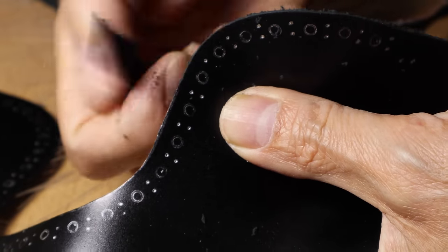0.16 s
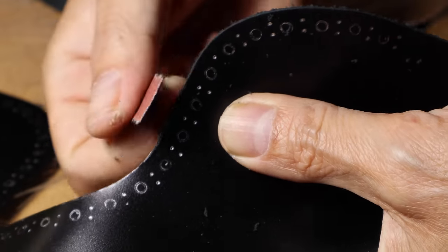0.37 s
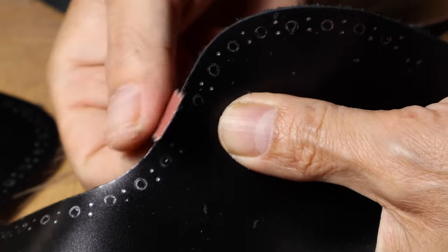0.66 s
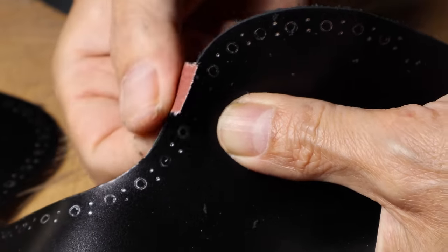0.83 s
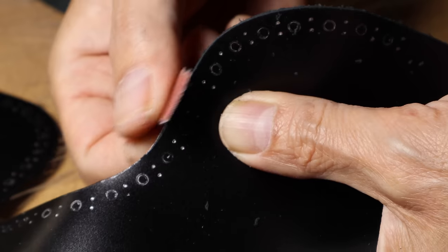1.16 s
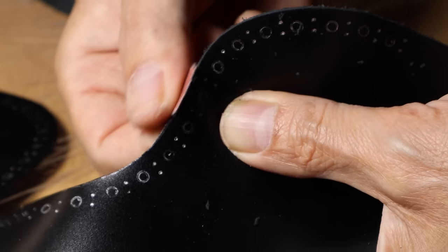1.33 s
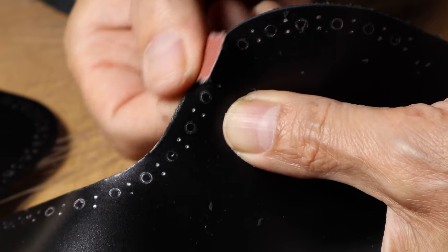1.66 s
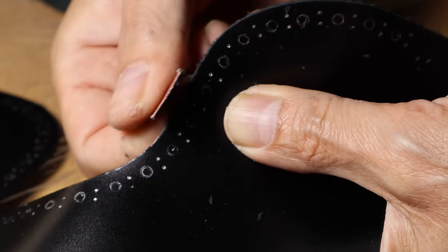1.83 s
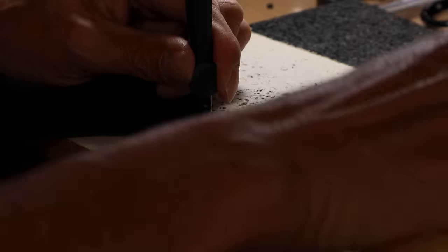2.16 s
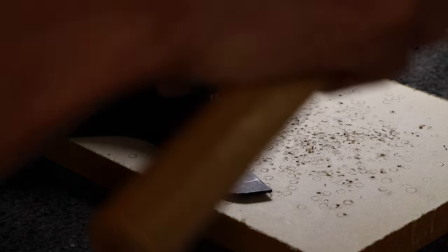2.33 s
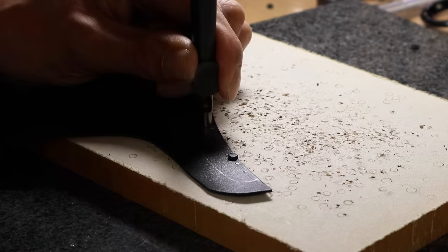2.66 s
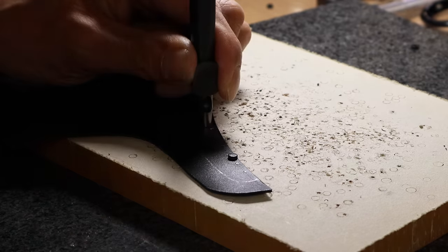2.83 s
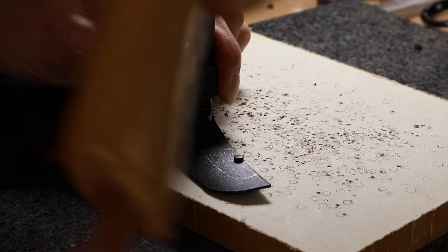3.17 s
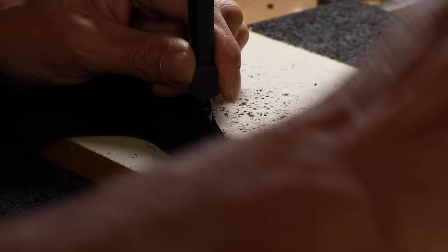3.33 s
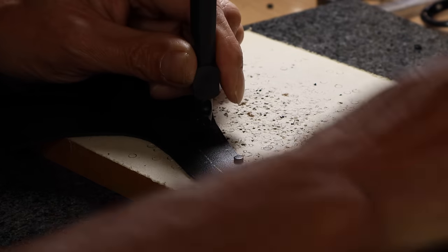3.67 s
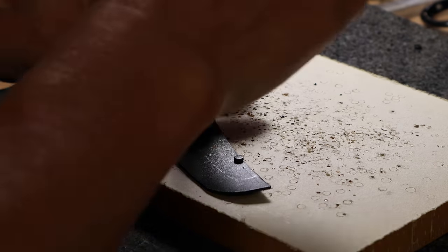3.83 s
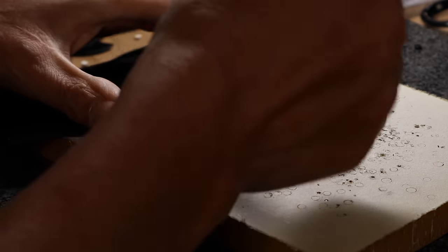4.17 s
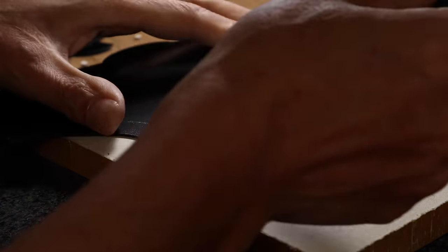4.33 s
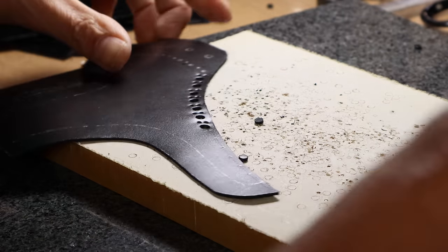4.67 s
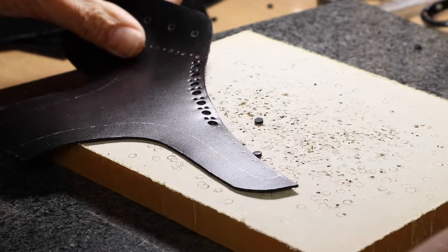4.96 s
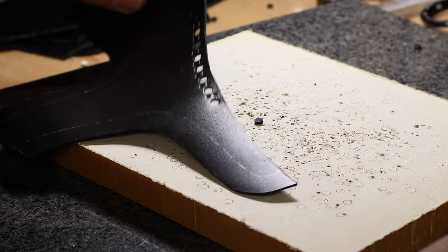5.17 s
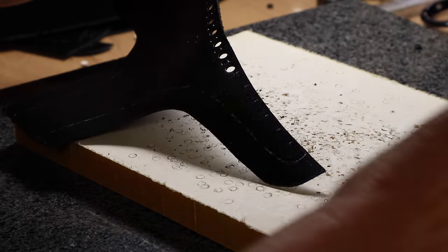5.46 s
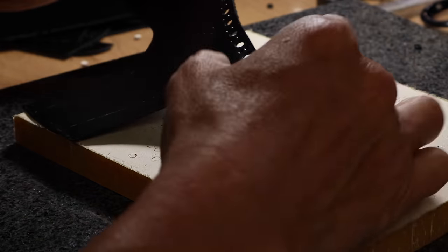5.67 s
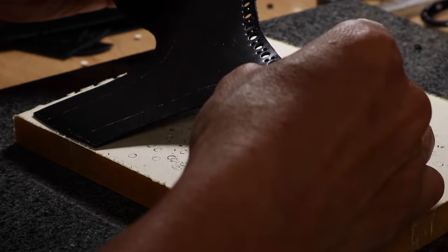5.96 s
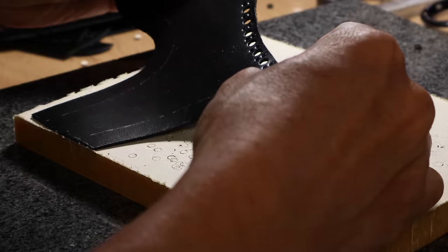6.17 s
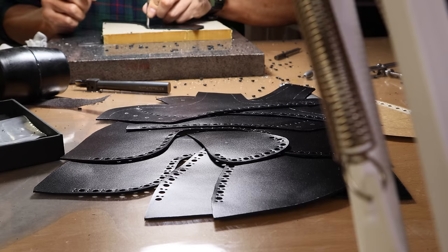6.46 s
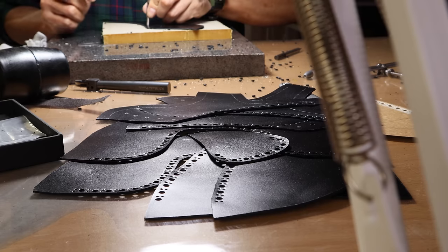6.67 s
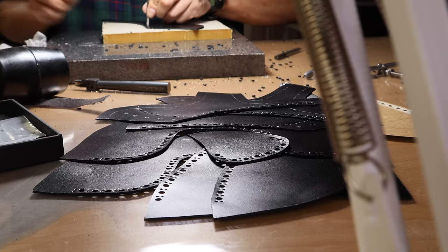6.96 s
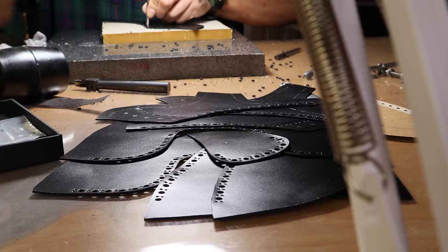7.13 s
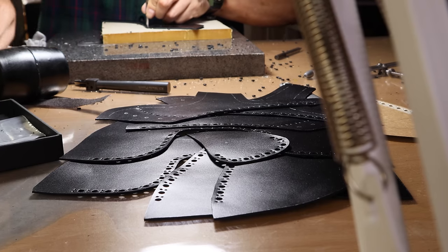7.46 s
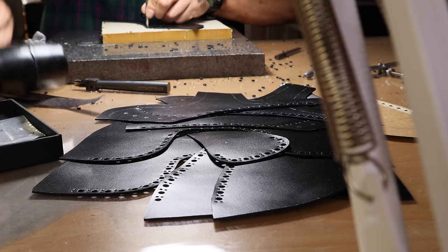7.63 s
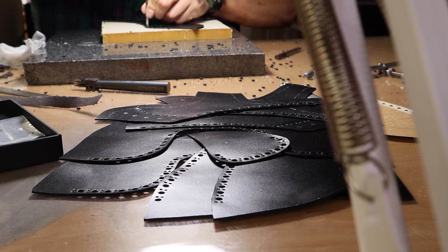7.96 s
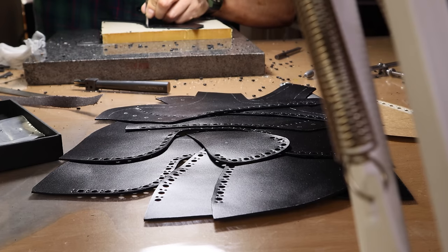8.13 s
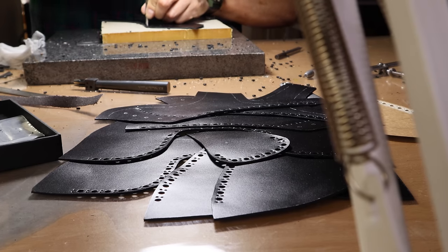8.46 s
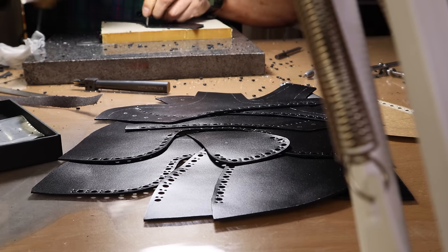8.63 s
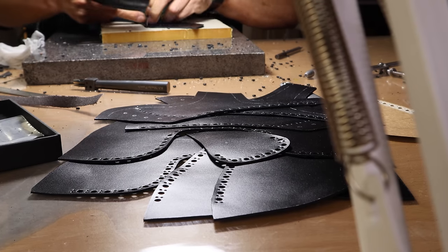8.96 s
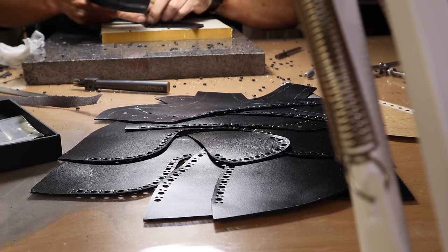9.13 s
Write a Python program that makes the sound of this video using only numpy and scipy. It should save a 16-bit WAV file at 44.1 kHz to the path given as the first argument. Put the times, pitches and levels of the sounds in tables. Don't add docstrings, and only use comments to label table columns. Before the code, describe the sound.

Faint dry rasping and small clicks come first, with light room hum that stops as sanding ends. Then uneven mallet blows on a metal punch snap loudly with woody board thuds and short room ring. Steel rattles brightly, a mallet knocks and bounces on the bench, distant dull knocks and tool shuffling follow, and a hard blow lands farther off. Close microphone at first, then more distant.

```python
import sys
import numpy as np
from scipy import signal
from scipy.fft import rfft, irfft, next_fast_len
from scipy.io import wavfile
from scipy.ndimage import uniform_filter1d, map_coordinates

SR = 44100
rng = np.random.default_rng(int(sys.argv[2]) if len(sys.argv) > 2 else 0)


def undo_db(level):
    steps = np.asarray(level, float) / 20
    return 10 ** steps


def to_wav(sig):
    pcm = np.clip(np.atleast_2d(sig), -1, 1) * 32767
    pcm = np.round(pcm).astype(np.int16)
    wavfile.write(sys.argv[1], SR, pcm.T)


N = 409953
T = np.arange(N) / SR


# start in seconds, crack peak in dB, body in dB over the crack,
# crack centre in Hz, room in dB.
BOARD_BLOWS = [
    (2.72, -9, -11.5, 880, -12.5),
    (2.7235, -10, -11, 1710, -14.5),
    (2.891, -21.5, -19, 710, -1),
    (3.0414, 12.5, -16, 1181, -3.5),
    (3.0425, 6, -30, 1900, -8),
    (3.598, -16, 1.5, 620, -6),
    (3.64, -31, -5, 600, -15),
    (3.7185, 0, -23, 1110, -14.5),
    (3.7194, -5.5, -50, 2210, -14),
    (3.748, -13.5, -19.5, 1110, -10.5),
]
# frequency in Hz, level in dB, t60 in seconds.
BOARD_MODES = [(86.04, -23, 0.2), (127, -7.5, .15), (160, -13, 0.089), (194, -0.5, 0.092), (228.5, 0, 0.11),
               (299, -4.5, 0.092), (337, -9, 0.23), (447, -16, .04), (600, -9, 0.029)]


def board(tails):
    rows = []
    for s, db, body_db, hz, room_db in BOARD_BLOWS:
        slope_db = 4.5 * min(np.log2(hz / 1200), 0) - 0.86
        rows.append((s, db, body_db, hz, slope_db, room_db))
    return knocks(rows, BOARD_MODES, tails, -1.1, t60=0.012, broad=0.36, push=-3.5)


# start in
# seconds, crack peak in dB, body in dB over the crack, slope above the centre in dB per octave, room in dB.
MALLET_BOUNCES = [(5.347, 1.5, -15, -16, -7), (5.395, -11, -5.5, -22.5, -21.5), (5.504, 2.5, -14.5, -8, -5),
                  (5.535, -15, -11.5, -16, -4), (5.5405, -14, -10.5, -12.5, -4),
                  (5.545, -14.5, -10, -11, -4), (5.551, -18.5, -10, -15, -7),
                  (2.752, -20, -18.5, -4, -16.5), (5.602, -14.5, -7, -27, -7.5),
                  (5.688, -25, -0.5, -0.5, -11), (8.095, -33.5, -16.5, -13, -1.5)]
# start in seconds, peak in dB.
MALLET_ROCKING = [
    (5.726, -31.5),
    (5.755, -37.5),
    (5.799, -39),
    (5.879, -49.5),
    (6.08, -65),
]
# frequency in Hz, level in dB, t60 in seconds.
MALLET_MODES = [(131, -16, 0.33), (223, -3.5, 0.17), (299, -5, .08), (337, -1.5, 0.32), (444, -3, 0.061),
                (540, -1, 0.07), (677, -3.5, 0.11), (800, -3.5, 0.075), (940, -5, 0.057),
                (1370, -12.5, 0.025)]


def mallet(tails):
    rows = [(s, db, body_db, 660, slope_db, room_db) for s, db, body_db, slope_db, room_db in MALLET_BOUNCES]
    rows += alike(MALLET_ROCKING, body_db=3, hz=798, slope_db=-4, room_db=-4)
    return knocks(rows, MALLET_MODES, tails, -7, t60=0.0073, broad=1.0, push=-14)


# start in seconds, crack peak in dB, body in dB over the crack,
# slope above the centre in dB per octave, room in dB.
LAST_BLOW = [
    (8.341, 3, -18.5, -3, -10),
    (8.3426, -2, -17, -2.5, -7.5),
]
# frequency in Hz, level in dB, t60 in seconds.
SLAB_MODES = [(45.5, -13, 0.19), (73.8, -12, 0.2), (143.2, 1.5, 0.23), (222.7, -1, 0.22),
              (282.7, -0.5, 0.16), (429, -3.5, 0.081), (558, 0.5, 0.038), (697, -4.5, 0.056)]


def slab(tails):
    rows = [(s, db, body_db, hz, slope_db, room_db)
            for (s, db, body_db, slope_db, room_db), hz in zip(LAST_BLOW, (3000, 620))]
    return knocks(rows, SLAB_MODES, tails[::-1], -3.5, t60=0.037, broad=0.7)


# start in seconds, peak in dB, upper modes in dB,
# centre of the favoured upper modes in Hz, tick in dB.
LANDINGS = [
    (4.629, -55, -4, 9000, 2),
    (5.0321, -34, 9, 11500, 10),
    (5.0867, -37, 5.5, 9500, 7),
    (5.1222, -26, -13, 9300, -12),
]
RATTLES = [
    (5.145, -19, -13.5, 7140, -20),
    (5.2121, -34.5, 1, 7300, -4.5),
    (5.207, -43, 4.5, 12700, -22),
    (5.2942, -32, -9, 8440, -13.5),
    (5.3476, -37.5, -23.5, 7020, -23),
    (5.40, -54.5, 2, 12700, -15.5),
    (5.442, -52.5, 1.5, 7100, -7.5),
    (5.459, -53, 0.5, 12700, -10),
    (5.505, -27, 2.5, 12940, -6),
    (5.543, -36, -1, 12600, -23),
]
# start in seconds, peak in dB, bending modes in dB.
CHATTER = [(5.1583, -16, -3.5), (5.167, -20, 4), (5.178, -21, -9), (5.19, -23, 0.5), (5.196, -21, -3.5),
           (5.2, -21, -5), (5.2066, -21.5, -0.5), (5.2126, -22.5, -1), (5.2194, -27, 0), (5.2245, -28, 0),
           (5.234, -32.5, -0.5)]


def clinks():
    landings = [(*row, -5.5, 3) for row in LANDINGS]
    rattles = [(*row, -1, -19.5) for row in RATTLES]
    chatter = [(s, db - 8, -17, 7300, -23, bend_db - 0.5, -19.5) for s, db, bend_db in CHATTER]
    return landings + rattles + chatter


# frequency in Hz, level in dB, t60 in seconds.
STEEL_BEND = [(1447, -5.5, .025), (1502, 1.5, 0.061), (1780, -8, 0.02495), (2156, -11.5, .03),
              (2570, -2.5, 0.022), (2670, -0.5, 0.06), (2987, 0, 0.015)]
# frequency in Hz, level in dB, t60 in seconds.
STEEL_MID = [(3984, 1.5, 0.1), (3776, -11, .03), (4103, -8, 0.05), (4400, -8.5, 0.09), (4500, -13.5, .06),
             (4880, -8.5, 0.1), (5010, -13, 0.055)]
# frequency in Hz, level in dB, t60 in seconds.
STEEL_HIGH = [(7070, 0, .08), (7200, -1.5, .09), (7890, -10, .06), (8620, -7.5, .07), (9060, -1, 0.058),
              (10350, -1, 0.066), (11000, -8.5, .05), (12560, -0.5, .06), (12820, -5.5, .1),
              (14400, -14.5, .04)]
# frequency in Hz, level in dB, t60 in seconds.
BENCH_TAP = [(159.6, -17, 0.072), (205, -2.5, 0.086), (300, -10.5, 0.065), (463, -4, .05),
             (655, -2.5, 0.045), (1060, 2.5, .04)]


def punch(tails):
    track, t = np.zeros(N + 2 * SR), np.arange(SR // 7) / SR
    tails = tails[:, :SR // 2]
    favour = 28
    for k, (s, db, high_db, hz, tick_db, bend_db, knock_db) in enumerate(clinks()):
        upper = [(f, level - favour * abs(np.log2(f / hz)), t60) for f, level, t60 in STEEL_HIGH]
        steel = undo_db(-7.5) * ring(STEEL_MID, t, scatter_db=0.8, attack=0.00054, rough_db=1.0, rate=160)
        steel += undo_db(bend_db - 4.5) * ring(STEEL_BEND, t, scatter_db=0.5, attack=0.0004, rough_db=3.5, rate=170)
        steel += undo_db(high_db - 15.0) * ring(upper, t, scatter_db=3.0, attack=0.00015, rough_db=4.5, rate=120)
        blow = undo_db(knock_db - 6.0) * ring(BENCH_TAP, t, scatter_db=1.0, attack=0.0011, rough_db=4.5, rate=49)
        blow[:2048] += undo_db(bend_db + 1.0) * crack(1590, -7.5, 0.013, broad=0.22)[0]
        blow[:2048] += undo_db(tick_db + 3.5) * crack(hz, 0, 0.011, broad=0.089)[0]
        blow[:2048] += undo_db(bend_db + 1.5) * crack(2850, -9.5, 0.007, broad=0.3, push=4.5)[0]
        feed = 0.41 * steel + blow
        add(track, s - .0015, undo_db(db) * (steel + blow), undo_db(db) * feed, undo_db(-7.5) * tails[k % len(tails)])
    return track[:N]


# full contact in seconds, length in seconds, level at start in dB, level at end in dB,
# softness of the edges from 0 to 1.
STROKES = [
    (0.839, 0.043, -44, -49, .95),
    (1.125, 0.055, -41.5, -51.5, 1),
    (1.401, 0.055, -40.5, -45.5, .95),
    (1.668, 0.085, -45.5, -42, 1),
    (2.031, 0.041, -48, -44.5, .2),
]
# frequency in Hz, level in dB per Hz.
LEATHER = [(120, -35), (200, -10.5), (286, -4), (573, -2.5), (717, -0.5), (1390, 5), (1950, -1),
           (2300, -8.5), (2990, -27), (5060, -120)]
# frequency in Hz, level in dB.
GRIT = [(1800, -19), (2350, -20), (2700, 0.5), (3100, -2), (3700, 5), (4500, -7), (5500, -17), (7000, -10),
        (8000, -17), (9000, -12.5), (10500, -21), (12200, -13.5), (13500, -25), (16000, -24)]


def sandpaper():
    grains = rng.standard_normal(N) * undo_db(2.3 * rng.exponential(size=N)) * (rng.random(N) < .4)
    level, edge_db = 0, -78
    for s, length, in_db, out_db, soft in STROKES:
        knots = [s - soft * 0.047, s, s + length, s + length + soft * 0.035]
        level = level + undo_db(np.interp(T, knots, [edge_db, in_db, out_db, edge_db], left=-150, right=-150))
    rasp = coloured(grains, LEATHER) + undo_db(-10.5) * coloured(grains, GRIT)
    return level * rasp * undo_db(1.7 * wobble(74))


# start in seconds, peak in dB.
TICKS = [(0.0602, -35), (0.0664, -37), (0.0722, -33.5), (0.117, -39), (0.1211, -39), (0.1245, -36.5),
         (0.1292, -41), (0.454, -32.5), (0.745, -40), (0.826, -28.5), (0.927, -40), (1.119, -33.5),
         (1.22, -38), (1.381, -33), (1.51, -41.5), (1.798, -41), (2.826, -42), (3.534, -41)]
# frequency in Hz, level in dB, t60 in seconds.
PAD_MODES = [(210, 5.5, 0.13), (356, -4.5, .05)]


def ticks(tails):
    rows = alike(TICKS, body_db=-26, hz=1352, slope_db=-1, room_db=-12.5)
    return knocks(rows, PAD_MODES, tails[:, :SR // 4], -8.0, t60=0.014, broad=0.25, push=5.5)


# start in seconds, peak in dB, crack centre in Hz.
SNAPS = [(0.367, -44.5, 2940), (0.635, -42.5, 3830), (2.111, -44, 2860), (4.18, -49, 6065),
         (4.265, -44, 3960), (4.317, -35, 3100), (4.367, -22.5, 3450), (4.731, -46, 4000),
         (5.171, -43, 10200), (5.178, -40, 10330), (5.184, -44, 10000), (5.5034, -9.5, 7600),
         (8.3444, -3, 3100), (8.342, -12, 9990), (3.043, -5, 10000), (7.648, -35, 4910),
         (7.6495, -35.5, 2700), (7.714, -42.5, 3000), (7.7295, -44, 3000), (7.653, -41, 4900),
         (7.659, -40, 3280), (5.1227, -26, 1410)]


def snaps(tails):
    rows = [(s, db, -29, hz, -1.5, -17) for s, db, hz in SNAPS]
    return knocks(rows, PAD_MODES, tails[:, :SR // 3], -10.0, t60=0.0078, broad=0.25)


# start in seconds, peak in dB, crack centre in Hz.
SHIFTS = [
    (2.346, -42.5, 624),
    (7.228, -57, 1200),
    (4.285, -48.5, 687),
    (7.371, -35, 1523),
    (7.5872, -50, 775),
    (7.658, -41.5, 600),
    (7.716, -43, 1560),
    (7.721, -41, 780),
    (7.756, -43.5, 600),
    (8.096, -35.5, 737),
]


def shifts(tails):
    rows = [(s, db, -25.5, hz, -4.5, -1.5) for s, db, hz in SHIFTS]
    return knocks(rows, PAD_MODES, tails[:, :SR // 3], -6.5, t60=0.068, broad=0.58)


# start in seconds, peak in dB.
NUDGES = [
    (4.629, -45),
    (5.1445, -38.5),
    (5.19, -42),
    (5.206, -41),
    (8.094, -28.5),
    (8.112, -39.5),
]
# frequency in Hz, level in dB, t60 in seconds.
BENCH_TOP = [(140, -8.5, .08), (205, -3.5, .07), (322, 0.5, 0.054), (400, 0, 0.056), (564, -4.5, 0.057),
             (880, -9.5, 0.045)]


def nudges(tails):
    rows = alike(NUDGES, body_db=-1.5, hz=449.5, slope_db=-9, room_db=-4.5)
    return knocks(rows, BENCH_TOP, tails[:, :SR // 3], -4.5, t60=0.022, broad=.4)


# start in seconds, peak in dB.
THUMPS = [
    (7.393, -29),
    (0.36, -61),
]
# frequency in Hz, level in dB, t60 in seconds.
THUMP_MODES = [(60, -33, 0.11), (103, -14, 0.13), (149.2, -3, 0.24), (205, -4.5, 0.088), (266, -3, 0.11),
               (325, -14, 0.089)]


def thumps(tails):
    rows = alike(THUMPS, body_db=2, hz=546, slope_db=0, room_db=-11)
    return knocks(rows, THUMP_MODES, tails, 2.8, t60=0.033, broad=0.38)


# start in seconds, peak in dB.
FAR_KNOCKS = [
    (6.672, -45),
    (6.727, -50),
    (6.821, -53.5),
    (6.864, -50),
    (6.927, -42),
    (6.949, -54),
    (7.853, -48.5),
]
# frequency in Hz, level in dB, t60 in seconds.
BENCH_MODES = [(128, -22, 0.078), (145.8, -5.5, 0.23), (219, -8, 0.073), (260, -5, 0.087), (421, -10, 0.14)]


def far_knocks(tails):
    rows = alike(FAR_KNOCKS, body_db=-3, hz=433, slope_db=-8, room_db=-3)
    return knocks(rows, BENCH_MODES, tails[:, :SR // 3], 3.0, t60=0.0231, broad=0.42)


# start in seconds,
# level in dB, t60 in seconds, bright share from 0 to 1.
SCUFFS = [(.24, -64, 0.14, .15), (.71, -70, .2, .05), (4.885, -66, 0.23, .3), (4.94, -59.5, .3, 0.48),
          (5.416, -56, .006, 0.93), (5.453, -55, 0.0055, 1), (5.468, -56, .006, 1),
          (5.5916, -25, 0.02, 0.36), (5.5953, -36, .015, 0.2), (5.604, -29, 0.013, 0.24),
          (5.667, -52.5, .006, 1), (5.68, -41.5, 0.032, 0.04), (5.695, -53, .008, 1),
          (5.727, -44, 0.011, 0.3), (6.601, -67.5, .2, .1), (6.765, -59, 0.27, 0.28),
          (8.103, -46.5, 0.21, 0)]
# frequency in Hz, level in dB per Hz.
SCUFF_DULL = [(900, -30), (2000, 0), (3700, 2), (5200, -8), (7000, -36), (12000, -41.5)]
# frequency in Hz, level in dB per Hz.
SCUFF_BRIGHT = [(3000, -27), (6500, 2.5), (9500, -4), (13000, -8.5), (15500, -8), (17000, -41)]


def scuffs():
    grains = rng.standard_normal(N) * undo_db(2.5 * rng.exponential(size=N))
    dull, bright = coloured(grains, SCUFF_DULL), coloured(grains, SCUFF_BRIGHT)
    track, t = np.zeros(N), np.arange(SR // 3) / SR
    for s, db, t60, share in SCUFFS:
        at = slice(round(s * SR), round(s * SR) + len(t))
        envelope = undo_db(db - 60 * t / t60) * (1 - np.exp(-t / t60 * 25))
        track[at] += envelope * ((1 - share) * dull[at] + share * bright[at])
    return track


# start in seconds,
# frequency in Hz, level in dB, t60 in seconds.
SINGLE_TONES = [(2.725, 995, -36, 0.29), (2.76, 945, -43, .3), (2.82, 948, -44, .2), (8.36, 31, -58, 3),
                (8.36, 53, -61, 3), (2.893, 690, -37.5, 0.1), (3.043, 275, -42, 1.76), (3.05, 205, -27.5, 0.56),
                (3.05, 340, -32, 0.45), (3.05, 125, -33.5, 0.54), (3.6, 279, -49, 2.9),
                (7.652, 1750, -41, .025), (7.657, 1720, -41, .022), (7.684, 1750, -53, .06),
                (7.653, 980, -48, .1), (7.7285, 1750, -44, .014), (3.05, 1195, -38, .8), (3.05, 1255, -38, .8),
                (3.05, 1330, -38, .8), (3.05, 585, -31, .5), (3.043, 35, -17, .1), (5.505, 35, -33, .12),
                (3.6, 198, -21, .17), (3.6, 120, -28, .2), (8.096, 300, -38, .12), (5.35, 200, -27, .1),
                (5.15, 390, -44, .25), (5.034, 210, -40, .15), (0.147, 1150, -49, .06), (6.927, 150, -50, .15),
                (0.455, 180, -52, .1), (3.718, 1100, -63, 2.13), (3.72, 1253, -66, 1.3),
                (5.503, 366, -45.5, 1.6), (8.342, 350, -47.5, 1.3)]


def single_tones():
    track = np.zeros(N + 2 * SR)
    for s, hz, db, t60 in SINGLE_TONES:
        t = np.arange(int(min(t60, 1.25) * SR)) / SR
        tone = ring([(hz, 0, t60)], t, scatter_db=1.47, attack=min(.015, t60 / 25),
                    rough_db=2.0 * t60 ** -.4, rate=44)
        track[round(s * SR):][:len(t)] += undo_db(db) * tone
    return track[:N]


# time in seconds, level in dB.
BACKGROUND_LEVEL = [(0, -64), (.5, -64.5), (.66, -69.5), (.72, -60.5), (1, -65), (1.95, -64.5), (2.2, -72.5),
                    (3.5, -74.5), (3.96, -62.5), (4.55, -70), (4.95, -67), (5.9, -72.5), (6.1, -76.5), (7.35, -75.5),
                    (7.8, -64), (8.4, -69.5), (8.95, -68), (9.3, -76.5)]
# centre in seconds, half length in seconds, level in dB.
BRUSHES = [
    (.24, 0.018, -68),
    (.4, 0.15, -75),
    (.64, 0.014, -68),
    (.76, 0.0086, -68),
    (3.88, 0.031, -79),
    (4, 0.0457, -71.5),
    (4.72, 0.076, -74.5),
    (5.85, 0.075, -83.5),
]
# centre in seconds, half length in seconds, level in dB.
THRUMS = [
    (.45, 0.031, -70),
    (4.3, 0.16, -70),
    (4.7, 0.24, -73.5),
    (5.4, 0.54, -66),
    (8.6, 0.26, -65),
    (9.25, 0.31, -67.5),
]
# centre in seconds, half length in seconds, level in dB.
SWISHES = [
    (.28, 0.18, -68),
    (.8, 0.35, -73.5),
    (1.3, 0.09, -67),
    (2.48, 0.093, -75),
    (4.42, 0.11, -76),
    (4.71, 0.024, -66),
    (6.42, 0.13, -86.5),
]
# frequency in Hz, level in dB.
SUB = [(15, -23), (40, -15.5), (70, -5.5), (95, 0), (140, -25), (300, -120)]
# frequency in Hz, level in dB per Hz.
RUMBLE = [(12, -35.5), (20, -13.5), (65, -13.5), (167, -1), (428, -3.5), (550, -6.5), (749, -6.5),
          (840, -9), (2000, -18.5), (2600, -49), (4400, -120)]
# frequency in Hz, level in dB.
RUSTLE = [(710, -32.5), (1200, -3), (1360, -5.5), (1690, -6.5), (2040, -7), (2450, -5), (2720, -5.5),
          (3730, -3), (5470, -15.5), (8000, -21), (10400, -50.5), (17600, -120)]
# frequency in Hz, level in dB.
HISS = [(3530, -21), (6000, -0.5), (11700, -1.5), (13900, -1.5), (15300, -2.5), (16200, -8)]
# frequency in Hz, rms level in dB.
HUM = [(242.2, -71.5), (301.5, -69.5), (419.9, -70.5)]


def air():
    floor_db = np.interp(T, *np.transpose(BACKGROUND_LEVEL))
    floor_db = floor_db - floor_db.mean()
    sub_level = (undo_db(-81) + swells(THRUMS)) * undo_db(3.1 * wobble(7.1))
    sub = sub_level * coloured(rng.standard_normal(N), SUB)
    rumble = undo_db(-64.5 + 0.25 * floor_db + 1.2 * wobble(14)) * coloured(rng.standard_normal(N), RUMBLE)
    cloth = undo_db(1.9 * wobble(21)) * rng.standard_normal(N)
    rustle = undo_db(-69.5 + floor_db) * coloured(cloth, RUSTLE) + swells(SWISHES) * coloured(cloth, GRIT)
    hiss_level = (undo_db(-76.5 + 0.3 * floor_db) + swells(BRUSHES)) * undo_db(1.2 * wobble(7.8))
    hiss = hiss_level * coloured(rng.standard_normal(N), HISS)
    hum = sum(undo_db(db + 4.0 + 0.99 * wobble(3.6)) * np.sin(2 * np.pi * hz * T) for hz, db in HUM)
    return sub + rumble + rustle + hiss + hum * (T < 2.08)


# frequency in Hz, t60 in seconds.
ROOM_T60 = [(100, 0.36), (260, 0.73), (700, 0.44), (1840, 0.49), (4850, 0.46), (12800, 0.26)]
# frequency in Hz, level in dB.
ROOM_TONE = [(30, -19.5), (150, -4), (430, -4.5), (1000, 1), (2200, -0.5), (3700, 4), (6000, 1.5),
             (15000, -2)]


def room_tails(count):
    hz, t, z = signal.stft(rng.standard_normal((count, SR * 2 // 3)), SR, nperseg=256)
    decay_db = along(ROOM_TONE, hz)[:, None] - 60 * t / along(ROOM_T60, hz)[:, None]
    tails = signal.istft(z * undo_db(decay_db), SR, nperseg=256)[1]
    late = np.arange(tails.shape[1]) / SR
    tails *= np.clip(late / 0.00067, 0, 1)
    echoes = np.repeat(rng.standard_normal((count, len(late) // 64 + 1)), 64, axis=1)[:, :len(late)]
    tails *= undo_db(2.7 * uniform_filter1d(echoes, size=96) * np.exp(-late / 0.11))
    return tails / np.linalg.norm(tails, axis=1, keepdims=True)


def knocks(rows, modes, tails, body_db, t60, broad, push=0):
    track, t = np.zeros(N + SR), np.arange(SR // 5) / SR
    for k, (s, db, rel_db, hz, tilt_db, room_db) in enumerate(rows):
        tones = ring(modes, t, scatter_db=1.5, attack=0.00038, rough_db=3.5, rate=88)
        body = undo_db(db + rel_db + body_db) * tones
        burst, click = crack(hz, tilt_db, t60, broad, push)
        direct, feed = body.copy(), body.copy()
        direct[:len(burst)] += undo_db(db) * burst
        feed[:len(click)] += undo_db(db) * click
        add(track, s, direct, feed, undo_db(room_db) * tails[k % len(tails)])
    lowest_hz = 0.85 * min(modes)[0]
    return signal.sosfilt(signal.butter(4, lowest_hz / SR * 2, "high", output="sos"), track[:N])


def alike(rows, body_db, hz, slope_db, room_db):
    return [(*row, body_db, hz, slope_db, room_db) for row in rows]


def ring(modes, t, scatter_db, attack, rough_db, rate):
    knots = rng.standard_normal((len(modes), 65))
    tones = 0
    for k, ((hz, db, t60), row) in enumerate(zip(modes, knots)):
        waver_db = scatter_db * row[-1] + rough_db * np.interp(t * rate, np.arange(64), row[:-1])
        slip = 0.33 * rough_db * np.interp(t * rate, np.arange(65), row[::-1] - row[-1])
        tones = tones + (-1) ** k * undo_db(db + waver_db - 60 * t / t60) * np.sin(2 * np.pi * hz * t + slip)
    return tones * (1 - np.exp(-t / attack))


# frequency in Hz, level in dB.
CRACK = [(40, -43.5), (400, 5), (1500, 1.5), (4000, -3), (8000, -17.5), (16000, -26)]


def crack(hz, tilt_db, t60, broad, push=0):
    t = np.arange(2048) / SR

    def colour(f):
        slope = undo_db(along(CRACK, f) + tilt_db * np.log2(np.maximum(f / hz, 1)))
        resonance = 1j * f * 0.36 * hz / (hz * hz - f * f + 1j * f * .55 * hz)
        return slope * (broad + resonance)

    force = rng.standard_normal(len(t)) * undo_db(-60 * t / t60)
    force[44] += push
    burst = filtered(force, colour) * np.clip(t / 0.00074, 0, 1) ** 2
    burst = signal.lfilter(*signal.butter(2, 190 / SR * 2, "high"), burst)
    burst /= np.abs(burst).max()
    click = filtered(1. * (np.arange(len(t)) == 128), colour)
    return burst, click * np.linalg.norm(burst) / np.linalg.norm(click)


def add(track, s, x, feed, tail):
    sound = signal.fftconvolve(feed[:4096], tail)
    sound[:len(x)] += x
    track[round((s + .0008) * SR):][:len(sound)] += sound


def swells(rows):
    return sum(undo_db(db) * np.exp(-2 * ((T - s) / half_s) ** 2) for s, half_s, db in rows)


def wobble(rate):
    return map_coordinates(rng.standard_normal(int(N * rate / SR) + 4), [T * rate])


def coloured(x, spectrum):
    return unit(filtered(x, lambda hz: undo_db(along(spectrum, hz))))


def filtered(x, response):
    m = next_fast_len(len(x) + 2048)
    return irfft(rfft(x, m) * response(np.fft.rfftfreq(m, 1 / SR)), m)[:len(x)]


def along(points, hz):
    f, v = np.transpose(points)
    return np.interp(np.log(hz + 1), np.log(f + 1), v)


def unit(x):
    return x / np.sqrt(np.mean(x ** 2) + 1e-20)


def scene():
    tails = room_tails(count=8)
    sound = board(tails) + mallet(tails) + slab(tails) + punch(tails) + sandpaper()
    sound += ticks(tails) + snaps(tails) + shifts(tails) + nudges(tails)
    sound += thumps(tails) + far_knocks(tails) + scuffs() + single_tones() + air()
    return sound[None]


def roll_off(x):
    return signal.sosfilt(signal.butter(12, 16710, fs=SR, output="sos"), x)


# time in seconds, depth in dB (negative lifts), recovery in seconds.
DUCKS = [
    (3.046, 19, 0.097),
    (3.723, -5, 0.033),
    (5.355, -3, 0.026),
    (5.51, 2, 0.044),
    (8.347, 10.5, 0.052),
]


def record(dry):
    duck_db = sum(np.interp(T, [s - .002, s + 0.0017, s + back], [0, depth_db, 0]) for s, depth_db, back in DUCKS)
    microphone = signal.butter(6, 15400 / SR * 2, output="sos")
    x = signal.sosfilt(microphone, dry) * undo_db(-duck_db)
    clipped = x / (1 + np.abs(x) ** 8) ** (1 / 8)
    return roll_off(clipped)


dry = scene()
out = record(dry)
to_wav(out)
```